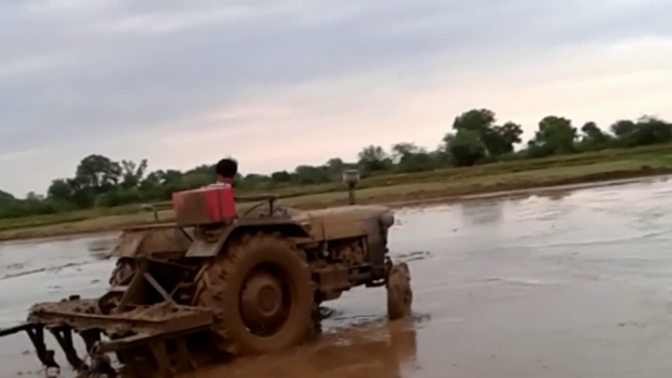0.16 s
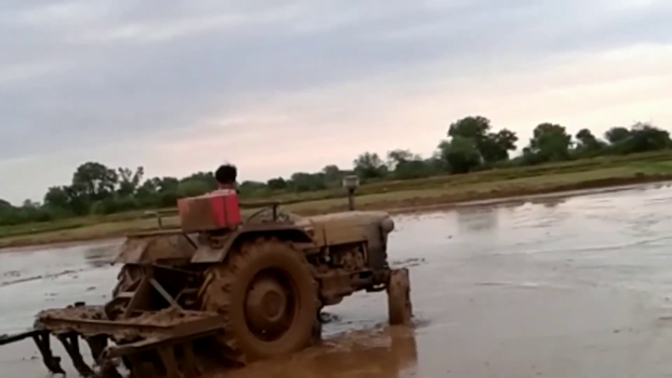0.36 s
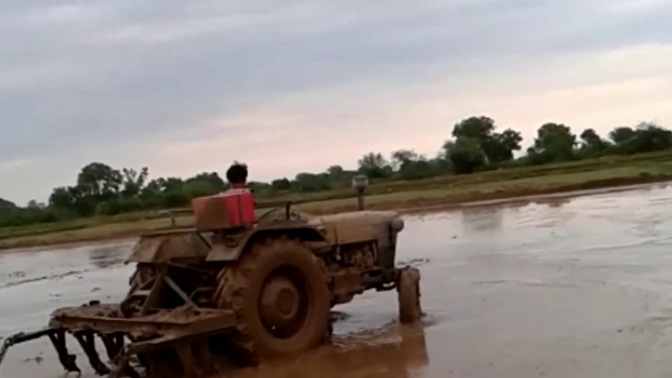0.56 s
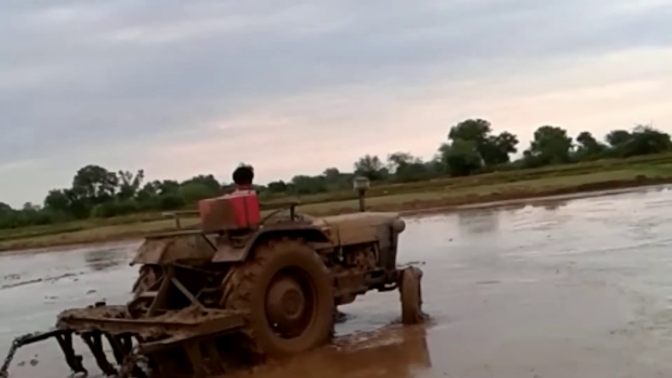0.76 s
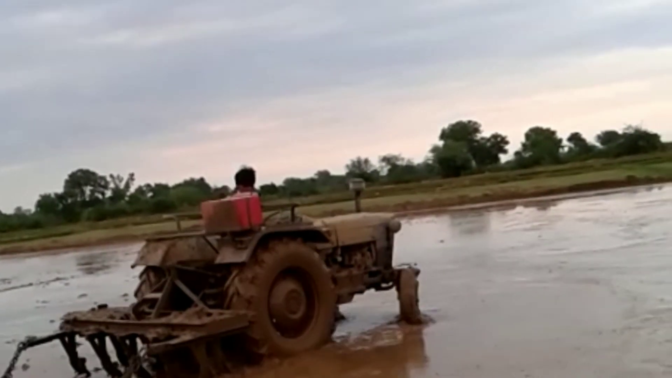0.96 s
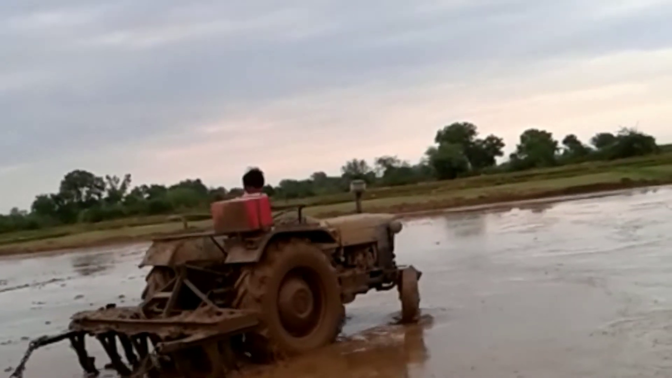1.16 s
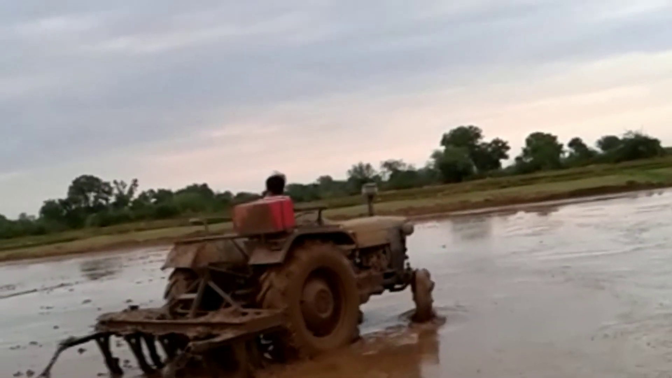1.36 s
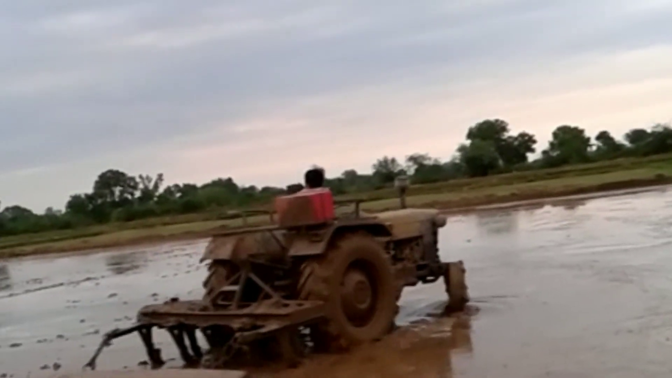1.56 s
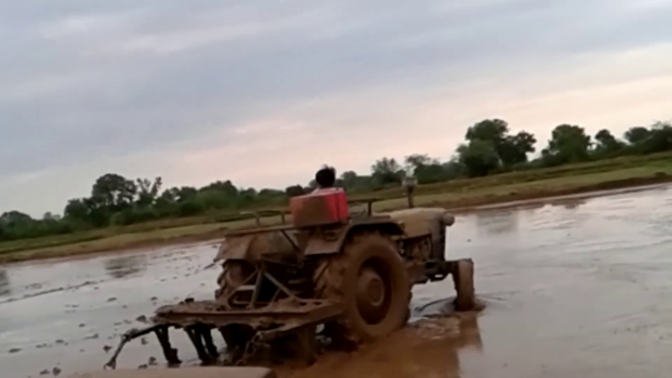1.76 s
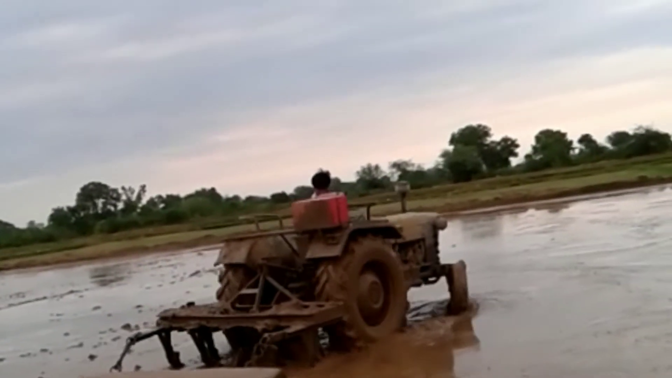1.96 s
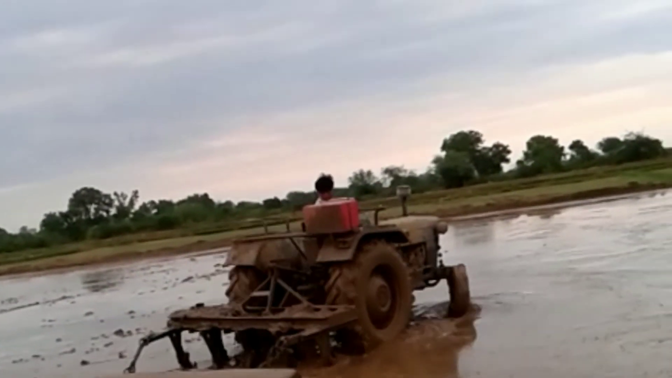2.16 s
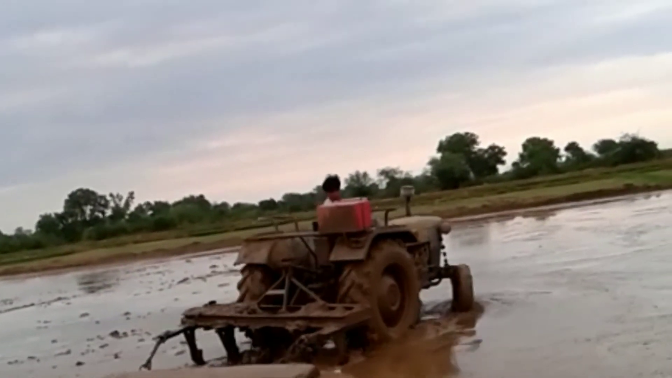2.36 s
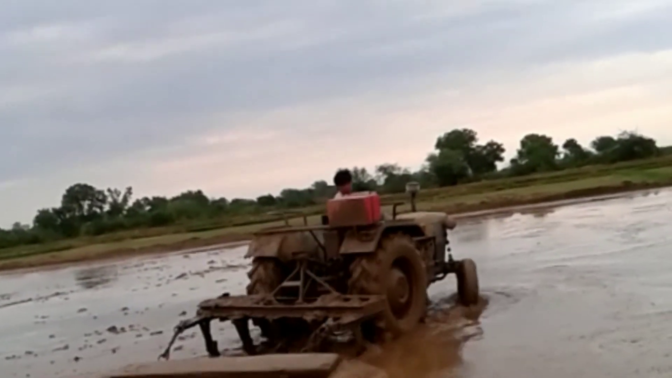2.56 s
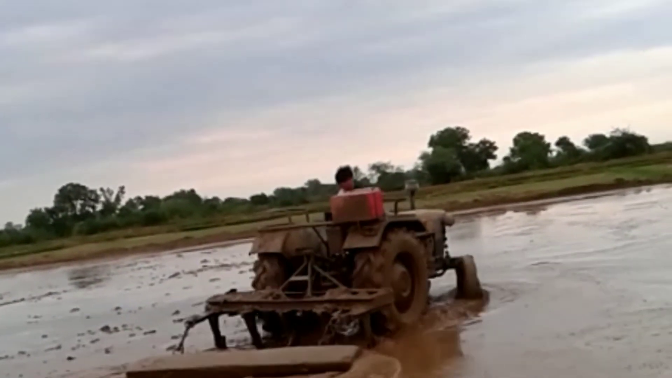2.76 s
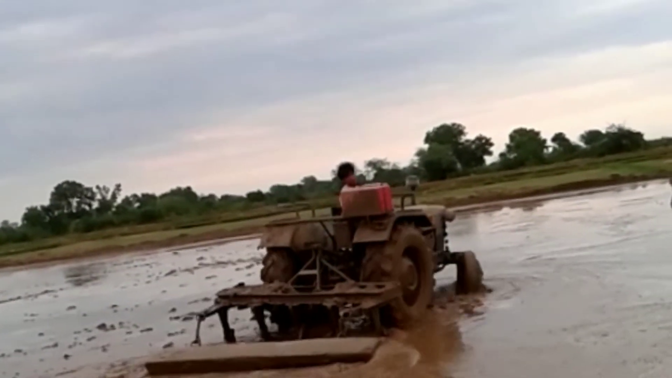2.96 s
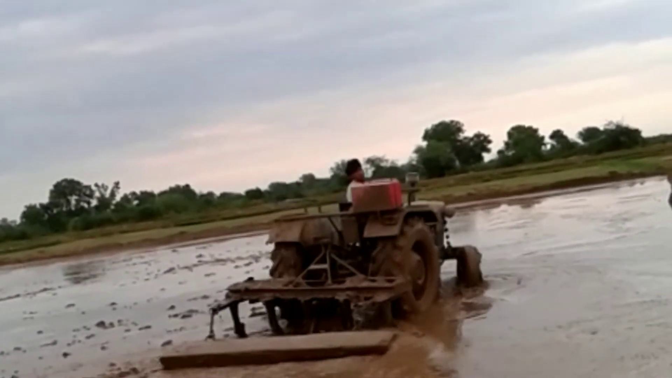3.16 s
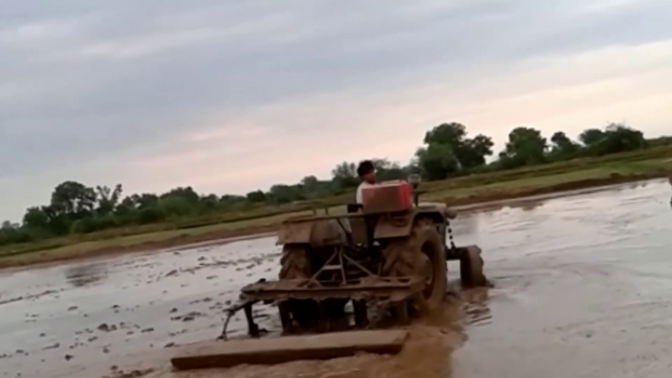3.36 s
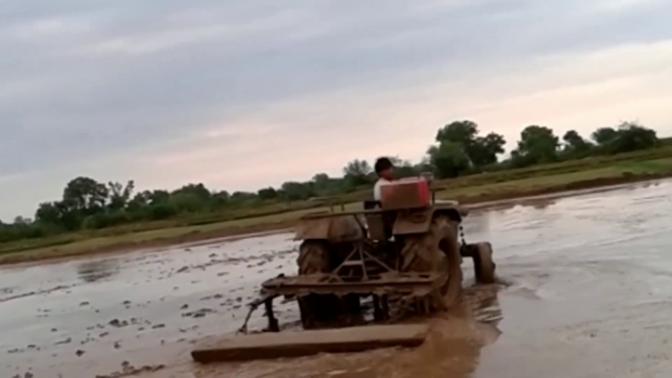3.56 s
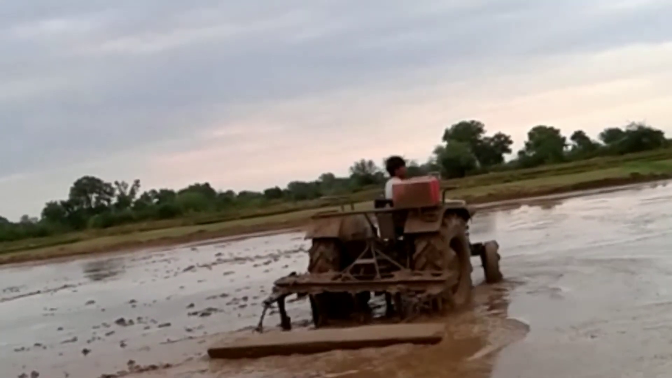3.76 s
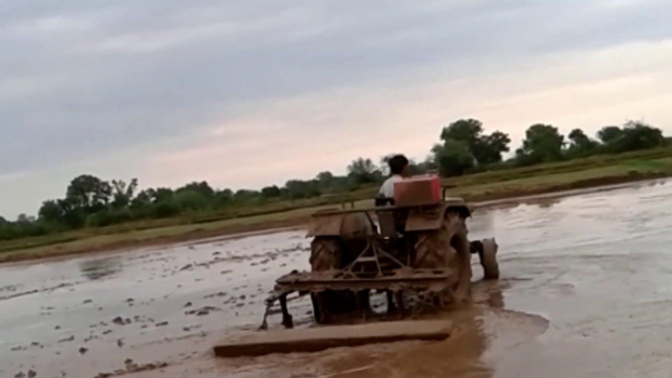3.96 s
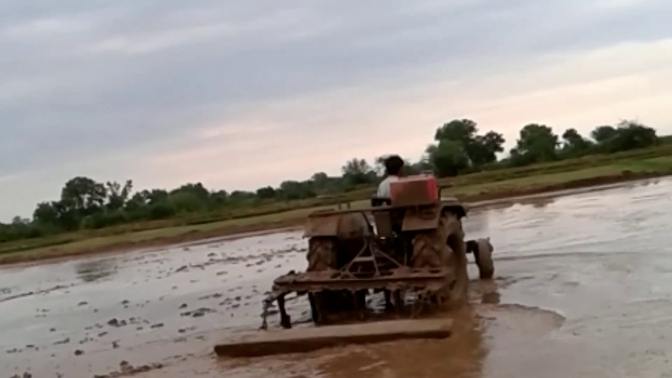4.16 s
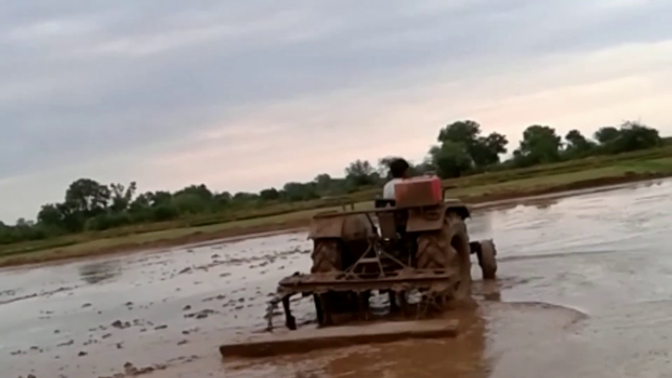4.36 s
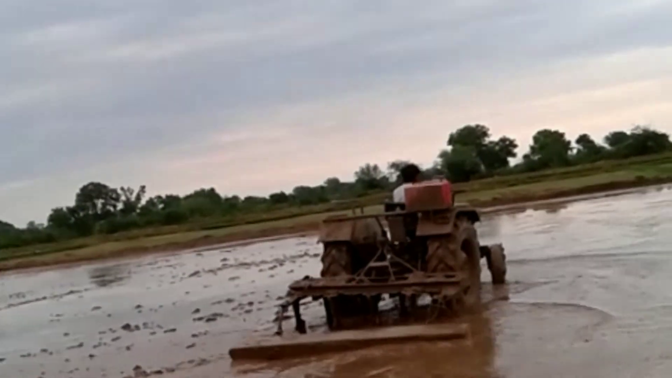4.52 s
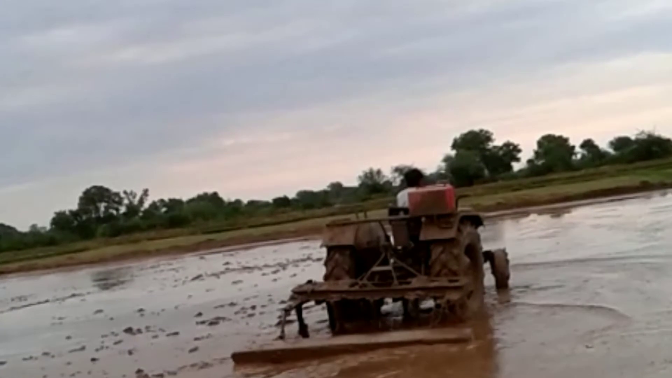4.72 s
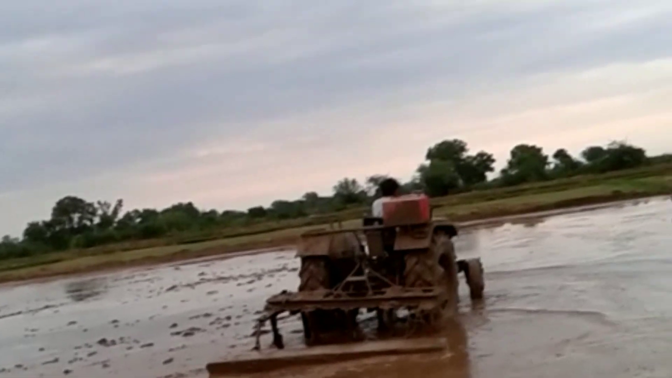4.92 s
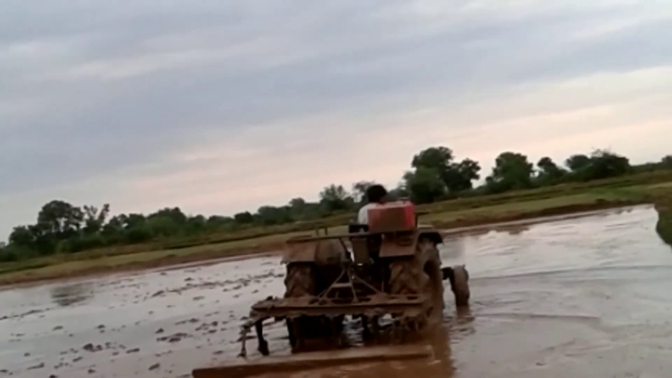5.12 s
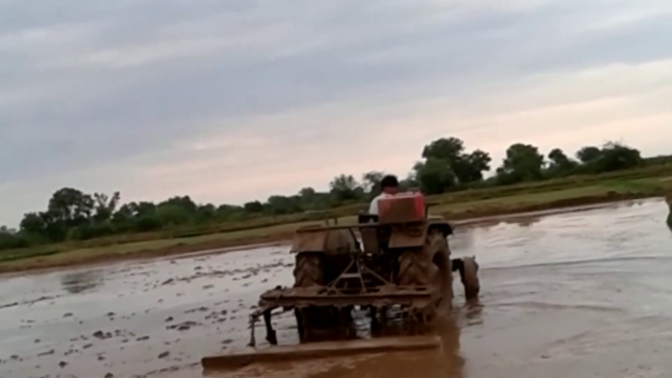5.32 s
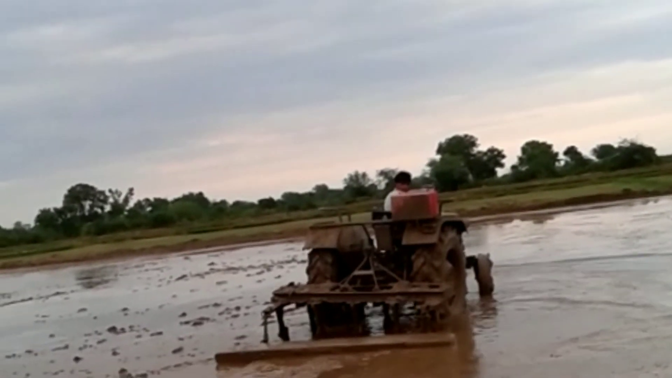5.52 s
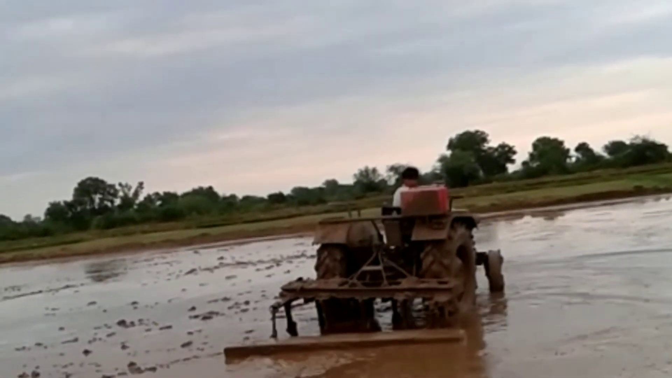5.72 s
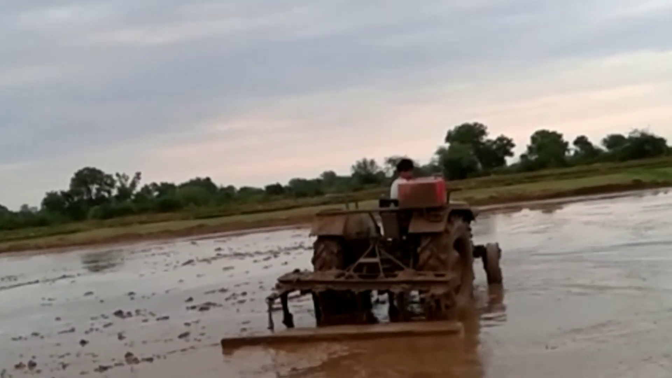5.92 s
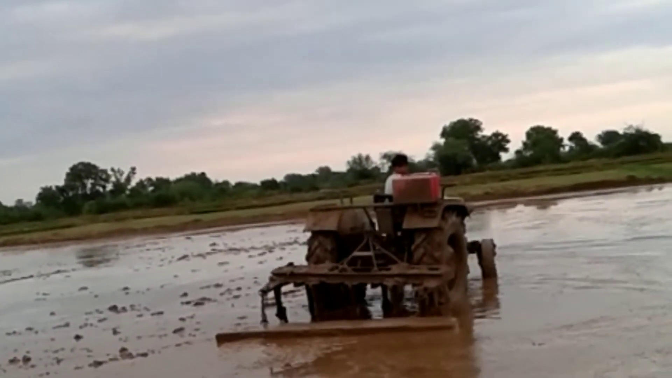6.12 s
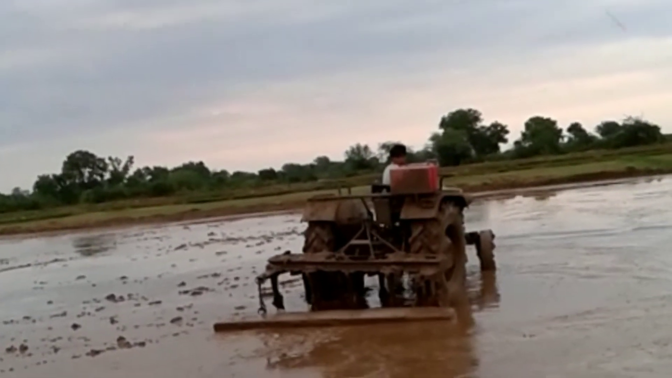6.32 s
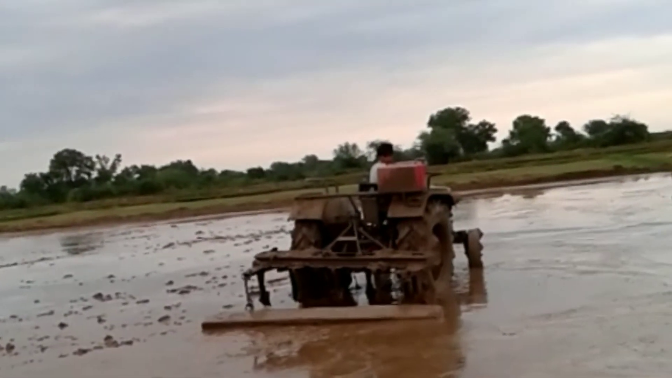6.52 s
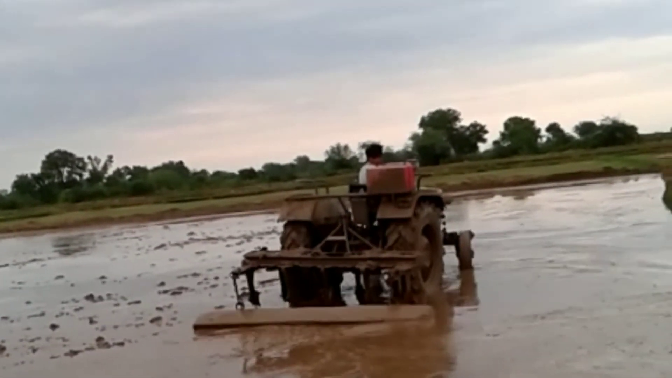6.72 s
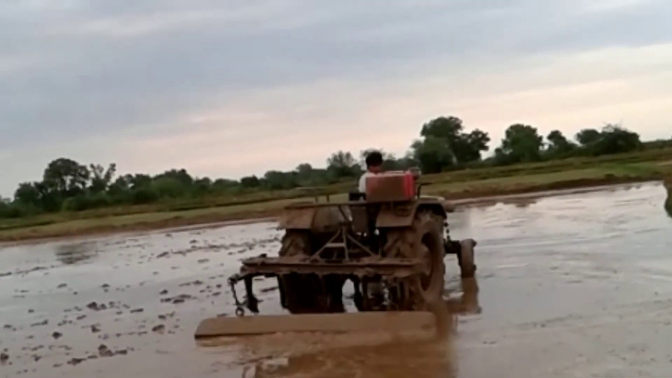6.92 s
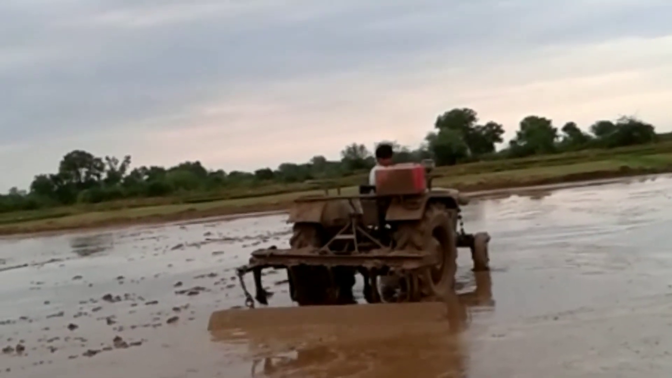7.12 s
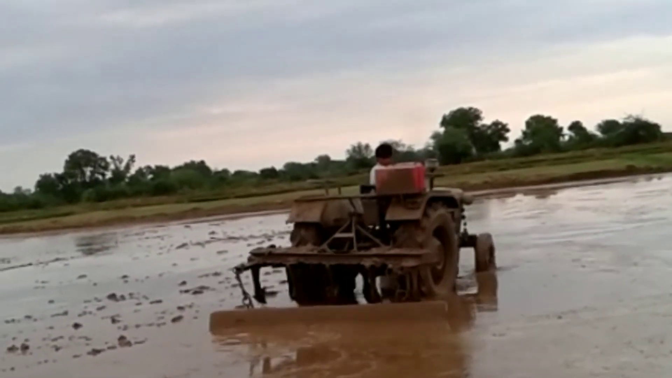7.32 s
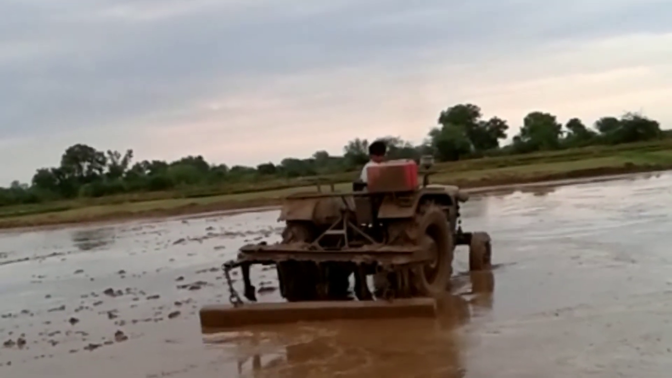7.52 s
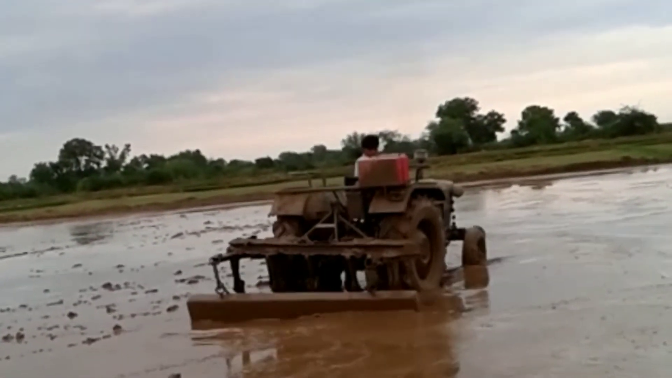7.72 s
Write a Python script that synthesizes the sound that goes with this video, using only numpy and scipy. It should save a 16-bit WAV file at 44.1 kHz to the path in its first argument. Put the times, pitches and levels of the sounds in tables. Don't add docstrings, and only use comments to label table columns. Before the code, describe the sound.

Steady knocking tractor engine with metallic clatter recedes over wet ground, throttles down sharply, then returns slow and heavy amid shrill cricket chirping.

```python
import sys
import numpy as np
from scipy import signal
from scipy.fft import rfft, irfft
from scipy.io import wavfile

SR = 44100
rng = np.random.default_rng(int(sys.argv[2]) if len(sys.argv) > 2 else 0)


def wrap_up_sound(samples):
    columns = np.atleast_2d(samples).T
    tamed = np.clip(columns, -1, 1)
    steps = np.round(tamed * 32767).astype(np.int16)
    wavfile.write(sys.argv[1], SR, steps)


def to_linear_factor(level_db):
    exponent = np.asarray(level_db, float) / 20
    return 10 ** exponent


N = 347493
CYLINDERS = 3


def rms_one(x):
    return x / np.sqrt(np.mean(x ** 2) + 1e-20)


def noise():
    return rng.standard_normal(N)


def in_time(rows):
    s, *columns = np.transpose(rows)
    return [np.interp(np.arange(N) / SR, s, c) for c in columns]


def butter(x, order, hz, kind="low"):
    return signal.sosfilt(signal.butter(order, hz, kind, fs=SR, output="sos"), x)


def colour(x, points):
    size = 8192
    hz, level_db = np.transpose(points)
    bins_hz = np.arange(size // 2 + 1) * SR / size
    log_gain = np.log(to_linear_factor(np.interp(np.log(bins_hz + 1), np.log(hz), level_db)))
    cepstrum = irfft(log_gain)
    cepstrum[1:size // 2] *= 2
    cepstrum[size // 2 + 1:] = 0
    return signal.fftconvolve(x, irfft(np.exp(rfft(cepstrum))))[:N]


def resonate(x, hz, width_hz):
    r = np.exp(-np.pi * width_hz / SR)
    poles = [1, -2 * r * np.cos(2 * np.pi * hz / SR), r * r]
    return signal.lfilter([(1 - r * r) / 2, 0, (r * r - 1) / 2], poles, x)


def burst(clicks, rise_s, fall_s):
    u = np.arange(int(.06 * SR)) / SR
    shape = (1 - np.exp(-u / rise_s)) ** 2 * np.exp(-u / fall_s)
    return np.maximum(signal.fftconvolve(clicks, shape / shape.max())[:N], 0)


def drift(rate_hz):
    r = np.exp(-2 * np.pi * rate_hz / SR)
    return rms_one(signal.lfilter([1], [1, -2 * r, r * r], rng.standard_normal(N + SR))[SR:])


# t/s, firing rate/Hz
ENGINE_SPEED = [(0.0, 29.25), (0.41, 28.66), (0.81, 29.42), (2.12, 28.82), (3.93, 33.47), (4.57, 33.51),
                (4.93, 32.96), (6.27, 18.61), (6.52, 20.01), (6.76, 15.58), (7.2, 17.31), (7.65, 16.17),
                (7.88, 17.39)]


def crank():
    first_firing = -0.48
    return first_firing + np.cumsum(in_time(ENGINE_SPEED)[0]) / SR


def passes(turns, count, offset):
    return np.flatnonzero(np.diff(np.floor((turns - offset) / count)) > 0)


def breeze():
    air = rms_one(butter(noise(), 2, [22, 60], "band"))
    return to_linear_factor(-63 + 3.0 * drift(2.6)) * air


# t/s, level/dB
FAR_CHORUS = [(0, -83), (3, -57), (5, -45), (6.5, -45), (7.88, -43.5)]


def far_crickets():
    band = rms_one(butter(noise(), 3, [6800, 8100], "band"))
    return to_linear_factor(in_time(FAR_CHORUS)[0] + 1.5 * drift(40)) * band


# first chirp t/s, last chirp t/s, peak level/dB
CHIRP_PHRASES = [(0.034, 0.098, -37), (0.1994, 0.5515, -21), (0.8863, 1.1578, -23.5), (1.2503, 1.383, -28),
                 (1.4974, 1.6963, -29), (1.8056, 2.0128, -31), (2.124, 2.4087, -24), (2.6613, 3.1255, -26),
                 (3.248, 3.4566, -25.5), (3.6079, 3.7495, -26.5), (3.8807, 4.144, -24),
                 (4.3064, 4.438, -26), (4.6238, 4.6238, -24.5), (4.7389, 5.1917, -26),
                 (5.2594, 5.4046, -28), (5.517, 5.8462, -26.5), (5.9787, 6.1846, -25.3),
                 (6.2497, 6.8949, -24.5), (6.973, 7.761, -25), (7.8483, 7.8483, -25)]


def chirps():
    chirp_gap_s = .067
    return [(s, peak_db) for first, last, peak_db in CHIRP_PHRASES
            for s in np.linspace(first, last, round((last - first) / chirp_gap_s) + 1)]


def wing_stroke(bend):
    u = np.linspace(-1, 1, int(.012 * SR))
    hz = 7500 + 40 * bend - 850 * u
    return np.exp(-(u / 0.48) ** 2) * np.sin(2 * np.pi * np.cumsum(hz) / SR)


# t/s, peak level/dB
HALF_CHIRPS = [
    (3.836, -25),
    (4.25, -24),
    (4.572, -25.5),
]


def near_cricket():
    out = np.zeros(N + SR)

    def add(start_s, level_db, stroke):
        i = round(start_s * SR)
        out[i:i + len(stroke)] += to_linear_factor(level_db) * stroke

    for s, peak_db in chirps():
        lag, fade, bend, effort = rng.standard_normal(4)
        stroke = wing_stroke(bend)
        chirp_db = peak_db - 0.9 * effort
        add(s - .006, chirp_db, stroke)
        add(s + .0145 + .0003 * lag, chirp_db - .3 + 1.1 * fade, stroke)
    for s, peak_db in HALF_CHIRPS:
        add(s - .006, peak_db, wing_stroke(rng.standard_normal()))
    return out[:N]


def wheel_spray(level_db):
    fine = resonate(noise(), 13000, 4000)
    coarse = resonate(noise(), 5700, 900)
    return to_linear_factor(-62 + 0.32 * (level_db + 36)) * rms_one(fine + to_linear_factor(-7) * coarse)


# t/s, level/dB
GEAR_WHINE = [
    (0, -66),
    (1.25, -49),
    (1.45, -75),
    (7.88, -90),
]


def whine():
    hz = 5324 + 5 * drift(4)
    return to_linear_factor(in_time(GEAR_WHINE)[0]) * np.sin(2 * np.pi * np.cumsum(hz) / SR)


def valve_tick(turns, level_db):
    at = passes(turns, count=CYLINDERS, offset=1.64)
    clicks = np.zeros(N)
    clicks[at] = to_linear_factor(level_db[at] - 7 + rng.normal(0, 2.5, len(at)))
    tick = burst(clicks, .0012, .0035) * noise()
    return butter(tick, 2, [9000, 14000], "band")


# t/s, level/dB
MANIFOLD_RING = [(0, -31.5), (.85, -31), (1.1, -35), (2.5, -46), (3.2, -62), (7.88, -70)]


def manifold(turns):
    at = passes(turns, count=CYLINDERS, offset=-0.041)
    clicks = np.zeros(N)
    clicks[at] = to_linear_factor(in_time(MANIFOLD_RING)[0][at] + 50.5 + rng.normal(0, 0.5, len(at)))
    return resonate(resonate(clicks + 1e-18, 406, 40), 410, 120)


# f/Hz, level/dB
CLATTER_SPECTRUM = [(76, -14), (130, 3.5), (342, 8.5), (491, -9), (829, -2.5), (1240, -15), (1520, -9),
                    (2010, -14), (2270, -11), (3750, -19.5), (4410, -21.5), (6470, -10.5), (7600, -3.5),
                    (8740, -8), (16000, -35)]


def clatter(turns, level_db, bright_db):
    ticks_per_s = 2500
    strength_db = 1.2 * np.minimum(rng.exponential(1, N), 3)
    ticks = to_linear_factor(strength_db) * (rng.random(N) < ticks_per_s / SR) + 0.68
    pulse_db = 0.8 * drift(30.0) + 0.59 * np.cos(2 * np.pi * (turns - .2))
    body = colour(ticks * noise() * to_linear_factor(pulse_db), CLATTER_SPECTRUM)
    throb = to_linear_factor(3 * np.cos(2 * np.pi * (turns - .3)) + 2.5 * drift(16))
    body = body + to_linear_factor(2) * resonate(body * throb, 828, 450)
    # f/Hz, width/Hz, level/dB
    for hz, width_hz, lift_db in [(1495, 720, 6.5), (2130, 620, 0.5), (2528, 227, 6.5), (3236, 265, 5.0),
                                  (4180, 340, 1.2), (4680, 160, -2.5), (5330, 134, 1.0), (5910, 116, -5.2)]:
        body = body + to_linear_factor(lift_db) * resonate(body, hz, width_hz)
    low = butter(body, 2, 1900)
    top = butter(body, 2, 6000, "high")
    middle = body - low - top
    hollow = np.clip(0.093 * bright_db + 0.12, 0, .6) * resonate(low, 417, 210)
    tilted = low - hollow + to_linear_factor(bright_db) * middle + to_linear_factor(1.4 * bright_db) * top
    return to_linear_factor(level_db + 1) * tilted / np.std(low)


CYLINDER_KNOCK = [
    0,
    -1.5,
    -3.5,
]
# t/s, peak level/dB, shift of the upper block ring/dB
STANDOUT_FIRINGS = [(0.1155, -4.5, 7), (0.1513, -7, 10), (0.325, -6.5, 14), (0.4645, -4, 10),
                    (0.5683, -6, 18), (0.7398, -6.5, 7), (1.046, -7, 12), (1.7672, -8.5, 5),
                    (1.8707, -5, 4), (1.9046, -10.5, 11), (2.588, -9, 9), (6.781, -11.5, 6),
                    (6.8433, -12, 16), (6.906, -11, 6), (6.9679, -5, -2), (7.0291, -7.5, 19),
                    (7.0898, -6, 6.5), (7.1471, -6, 5.5), (7.2063, -8, 10), (7.2654, -11, 5),
                    (7.322, -7, 4), (7.3812, -8.5, 5), (7.4413, -16, 4), (7.4998, -11.5, 1.5),
                    (7.562, -7, 2.5), (7.6228, -9, 4.5), (7.6831, -4, 4), (7.7437, -4, 1),
                    (7.8035, -9.5, 6), (7.8608, -4.5, -6)]
# f/Hz, level/dB
CRACK_SPECTRUM = [(300, -92), (900, 15), (2300, -40), (3400, -49), (4200, -3.5), (6500, -7), (9000, -22),
                  (11000, -24), (13000, -20), (16000, -45)]
# f/Hz, width/Hz, level/dB
BLOCK_MODES = [(840, 430, -22.5), (1523, 120, -8), (2169, 94, 7.5), (2314, 52, 9.5), (2507, 147, 3),
               (3018, 200, -4.5), (3260, 240, -7.5), (4400, 220, -37), (4010, 200, -22.5), (4525, 54, -9.5),
               (5400, 80, -37), (6240, 140, -10), (7330, 990, -8), (8220, 420, -2), (9010, 290, -2),
               (9710, 163, -4), (10170, 220, -12.5), (11500, 570, -17), (12200, 430, -18),
               (13700, 900, -20), (14400, 1500, -25)]


def knock(turns, level_db, facing_db, load_db):
    at = passes(turns, count=1, offset=-0.1)
    usual_db = level_db[at] + 5.0
    luck = rng.standard_normal((len(at), 3))
    cylinder = np.round(turns[at]).astype(int) % CYLINDERS
    peak_db = usual_db + np.take(CYLINDER_KNOCK, cylinder) + 0.7 * luck[:, 0]
    upper_db = 4 + 3.5 * luck[:, 1]
    bright_load_db, first_cylinder = load_db[at], cylinder == 0
    bright_facing_db = facing_db[at]
    for s, hard_db, upper in STANDOUT_FIRINGS:
        k = np.argmin(abs(at - s * SR))
        at[k] = round((s - .0022) * SR)
        peak_db[k], upper_db[k] = hard_db - 11, upper
    bright_db = -0.8 + 1.12 * bright_facing_db - 0.14 * bright_load_db
    bright_db = bright_db - 0.52 * (peak_db - usual_db) + 1.5 * luck[:, 2]
    bright_db = bright_db + 1.0 * first_cylinder

    clicks = np.zeros(N)
    clicks[at] = 1
    firing = np.maximum(np.cumsum(clicks > 0) - 1, 0)
    shake = noise()
    snap = (burst(clicks, 0.002, 0.0026) + to_linear_factor(-14) * burst(clicks, 0.0064, 0.011)) * shake
    rattle = (burst(clicks, 0.00077, 0.0027) + to_linear_factor(-10) * burst(clicks, 0.0032, 0.0088)) * shake

    crack = to_linear_factor(-19.5) * colour(snap, CRACK_SPECTRUM)
    main = butter(crack, 2, 4000)
    bright = crack - main
    spread = rng.standard_normal((len(at), len(BLOCK_MODES)))
    for k, (hz, width_hz, ring_db) in enumerate(BLOCK_MODES):
        casting = hz < 4000
        shift_db = (2800 < hz < 4000) * upper_db + (2.6 if hz > 2000 else 1.2) * spread[:, k]
        source = rattle if casting else snap
        ring = resonate(source * to_linear_factor(shift_db)[firing], hz, width_hz) * to_linear_factor(ring_db) * (-1) ** k
        if casting:
            main = main + ring
        else:
            bright = bright + ring

    def evened(part):
        return part / np.sqrt(np.add.reduceat(part ** 2, at) / 300)[firing]

    thud = to_linear_factor(17.5 + 0.19 * load_db) * resonate(resonate(clicks + 1e-18, 260, 340), 360, 860)
    return to_linear_factor(peak_db)[firing] * (evened(main) + thud + to_linear_factor(bright_db - 5.0)[firing] * evened(bright))


# f/Hz, level/dB
EXHAUST_SPECTRUM = [(30, -27), (54, -2.5), (75, 16), (90, 9), (118, 4), (147, 0.9), (205, -2.5),
                    (270, -4.5), (330, -34.5), (415, -35), (480, -38), (1000, -59)]


def exhaust(turns, level_db, pipe_db):
    at = passes(turns, count=1, offset=-0.05)
    clicks = np.zeros(N)
    clicks[at] = to_linear_factor(rng.normal(0, 1.0, len(at)))
    puffs = (.5 + burst(clicks, 0.016, 0.058)) * noise()
    rumble = butter(puffs, 2, [170, 400], "band")
    swell_hz, swell_width_hz = 75.3, 61.6
    r = np.exp(-np.pi * swell_width_hz / SR)
    middle = -2 * r * np.cos(2 * np.pi * swell_hz / SR)
    spreader = [[r * r, middle, 1, 1, middle, r * r]] * 3
    thump = rms_one(signal.sosfilt(spreader, colour(clicks[::-1], EXHAUST_SPECTRUM))[::-1])
    thump = thump + to_linear_factor(pipe_db - 1) * resonate(thump, 158.0, 53.0)
    return to_linear_factor(level_db) * (thump + to_linear_factor(-16.5) * rms_one(rumble))


# t/s, nearness level/dB, load/dB, facing/dB, pipe aim/dB
TRACTOR_PATH = [(0, -30.5, 5.5, 3, -4.5), (.6, -33, 7.5, 5, 1.5), (1.2, -31.5, 6, 3.5, 2.5),
                (1.9, -31.5, 7.5, 2, -7), (2.4, -34, 6.5, 3.5, 9), (2.85, -31.5, 2, 0.5, 0.5),
                (3.3, -34, 0, 1.2, 5.5), (3.8, -35, -7, 0.9, 3), (4.8, -36.5, -6, -0.5, -3.5),
                (5.3, -36.5, -12, -3, 6), (6.05, -43, -5, -0.5, -5), (6.15, -40, -1, -1.5, -16),
                (6.5, -40, -9, -1.5, -28), (6.78, -40, 13, -2, -26), (7.05, -37, 12, 0, -1.2),
                (7.3, -39, 9, 0, -2), (7.6, -38.5, 7.5, 0.7, 0), (7.88, -37.5, 12.5, 1.2, -1)]


def scene():
    turns = crank()
    near_db, load_db, facing_db, pipe_db = in_time(TRACTOR_PATH)
    field = far_crickets() + near_cricket()
    details = wheel_spray(near_db + facing_db) + whine() + valve_tick(turns, near_db) + manifold(turns)
    tractor = clatter(turns, near_db, facing_db)
    tractor = tractor + knock(turns, near_db - 0.28 + 1.123 * load_db, facing_db, load_db)
    tractor = tractor + exhaust(turns, near_db - 3 + 0.54 * load_db, pipe_db)
    mono = field + details + tractor
    return np.array([mono, mono])


# t/s, f/Hz
WIND_CORNER = [(0, 58), (3.2, 60.6), (4.82, 61.3), (4.86, 87), (5.08, 83), (5.11, 68), (5.15, 86),
               (6.03, 61), (6.12, 71.6), (6.6, 64.4), (7.88, 69)]


def wind_filter(dry):
    corner_hz, = in_time(WIND_CORNER)
    out, state, block = np.zeros_like(dry), np.zeros((4, 2, 2)), 1280
    for i in range(0, N, block):
        sos = signal.butter(8, corner_hz[i], "high", fs=SR, output="sos")
        out[:, i:i + block], state = signal.sosfilt(sos, dry[:, i:i + block], zi=state)
    rest_corner_hz, lift_db_per_hz = 60.8, 0.256
    lift = to_linear_factor(lift_db_per_hz * (corner_hz - rest_corner_hz)) - 1
    return out + lift * butter(out, 2, 214)


# t/s, level of the difference/dB
SPLIT_KNOCKS = [(.222, -9), (.636, -8), (1.148, -6), (1.355, -5), (1.423, -6), (1.558, -8), (1.663, -14),
                (2.079, -8), (7.863, -14)]


def split_treble(x):
    treble = np.roll(butter(x[0], 6, 5000, "high"), 37)
    t = np.arange(N) / SR
    gate = sum(to_linear_factor(split_db) * (abs(t - s - .002) < .008) for s, split_db in SPLIT_KNOCKS)
    return x + gate * treble * [[1], [-1]]


def top_cut(x):
    return signal.sosfilt(signal.butter(12, 16480, fs=SR, output="sos"), x)


def record(dry):
    out = wind_filter(dry) + breeze()
    out = signal.sosfilt(signal.ellip(12, .5, 70, 15750, fs=SR, output="sos"), out)
    return top_cut(split_treble(out))


dry = scene()
out = record(dry)
wrap_up_sound(out)
```